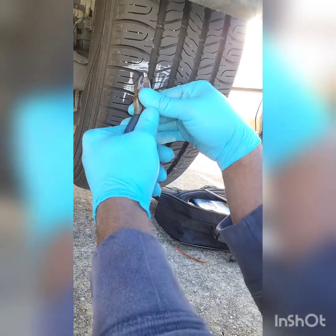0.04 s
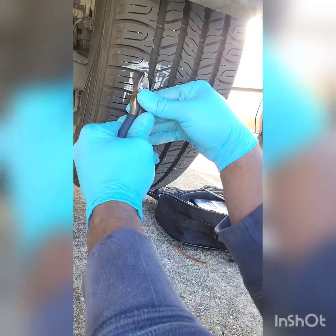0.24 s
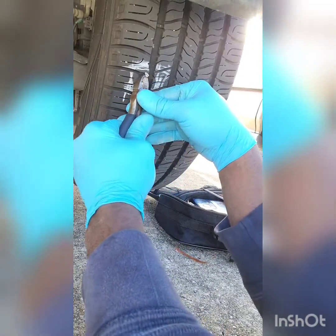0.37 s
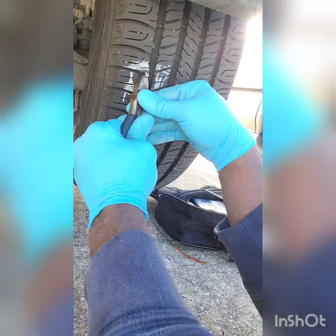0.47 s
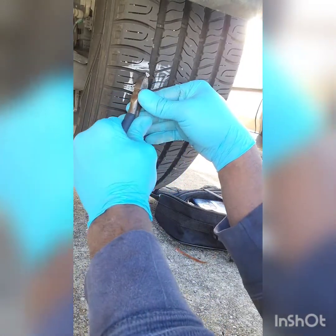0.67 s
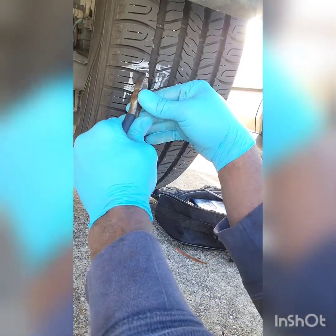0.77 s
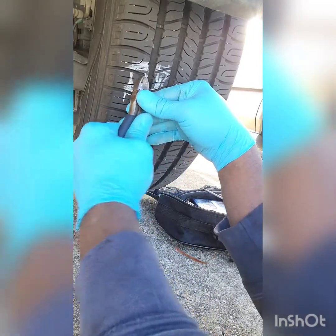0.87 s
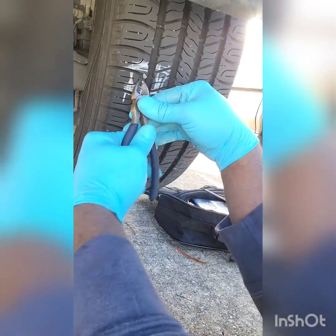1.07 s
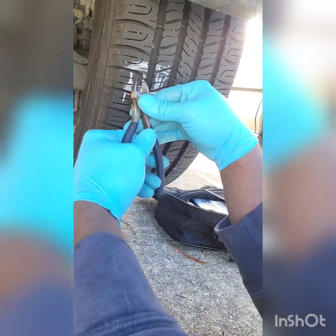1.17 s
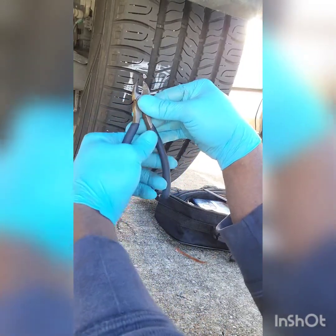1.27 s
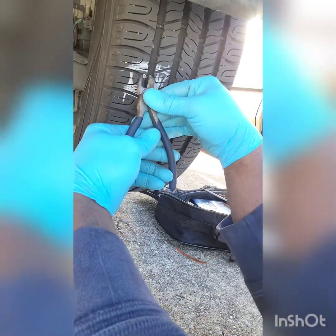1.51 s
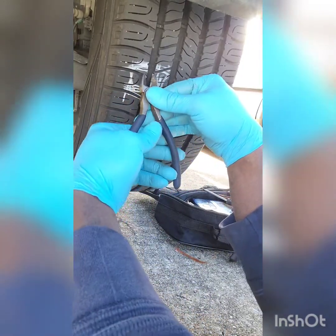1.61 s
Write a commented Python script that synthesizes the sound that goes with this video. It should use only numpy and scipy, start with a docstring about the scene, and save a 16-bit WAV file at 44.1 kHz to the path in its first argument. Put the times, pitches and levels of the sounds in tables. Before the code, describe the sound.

Tire leak hiss builds to a harsh rush, pliers clack midway, then it fades to faint seeping

```python
"""Air seeps from a punctured tire while pliers work a nail loose; turbulence makes a hiss, shaped noise.
The leak opens wide over half a second, with light ticks (noise snaps) and a faint knock on the way.
Near 0.56 s the pliers slip with a clack, decaying modes and a rattle; the loudest hiss overloads the left port.
By 1 s the leak is nearly shut; a faint breathy whistle near 3.3 kHz, narrow-band noise, is heard.
Street rumble, wind noise and low gust thumps at two microphone ports lie underneath."""
import sys
import numpy as np
from scipy import signal
from scipy.io import wavfile
from scipy.ndimage import uniform_filter1d

SR = 44100
rng = np.random.default_rng(int(sys.argv[2]) if len(sys.argv) > 2 else 0)


def volts(x):
    """Linear amplitude factor 10**(x/20) for a level x in dB, scalar or array-like."""
    e = np.asarray(x, float) / 20
    return 10 ** e


def digitize_waveform(pressure):
    """Quantize a signal to 16-bit integers and store it at the path in sys.argv[1].

    Rows of a 2-D input are taken as channels; values are limited to [-1, 1].
    """
    field = np.atleast_2d(pressure).T
    bounded = np.clip(field, -1, 1)
    quanta = np.round(bounded * 32767).astype(np.int16)
    wavfile.write(sys.argv[1], SR, quanta)


N = 72765  # samples, 1.65 s
RIGHT_LATE_S = 0.0002573  # arrival lag of hiss and ticks at the right port
HALVES = np.array([[.5], [-.5]])  # shares a left-minus-right level between the ports


def evened(x):
    """Normalization: scales to unit rms."""
    return x / np.sqrt(np.mean(x ** 2) + 1e-20)


def on_hz(table, hz, axis=1):
    """Spectral interpolation: reads a column on a log-frequency axis."""
    table = np.array(table)
    return np.interp(np.log(hz + 1), np.log(table[:, 0] + 1), table[:, axis])[:, None]


def on_s(table, t, axis=1):
    """Envelope interpolation: reads a column along time."""
    table = np.array(table)
    return np.interp(t, table[:, 0], table[:, axis])


def drift(shape, sizes):
    """Low-passed randomness: noise averaged twice along each axis, at unit rms."""
    z = rng.standard_normal(shape)
    for axis, size in enumerate(sizes):
        z = uniform_filter1d(uniform_filter1d(z, size, axis), size, axis)
    return evened(z)


def stft_grid(size):
    """Short-time spectrum: bin frequencies [Hz] and frame times [s]."""
    return np.fft.rfftfreq(size, 1 / SR), np.arange(4 * N // size + 5) * size / 4 / SR


def pair(field_db, same, late_s=0, ripple=1):
    """Partial coherence: two noises from a dB field (ports, bins, frames), the right one late."""
    bins, frames = field_db.shape[1:]
    a, b, c, d = rng.standard_normal((frames, bins, 4)).T
    same = np.clip(same, -1, 1)
    left = a + 1j * b
    # a delay is a phase turn proportional to frequency
    turn = np.exp(-2j * np.pi * late_s * np.linspace(0, SR / 2, bins))[:, None]
    right = same * turn * left + np.sqrt(1 - same ** 2) * (c + 1j * d)
    spectrum = np.array([left, right]) * volts(field_db) * ripple
    size = 2 * bins - 2
    noise = signal.istft(spectrum, nperseg=size, noverlap=size - size // 4)[1]
    return evened(noise[:, :N])


def place(out, sound, s, pan_db, late_s):
    """Stereo cues: lays a short sound on both ports with a level and time difference."""
    laid = np.zeros_like(out)
    for port, at_s, db in zip(laid, (s, s + late_s), (pan_db / 2, -pan_db / 2)):
        port[round(at_s * SR):][:len(sound)] = sound * volts(db)
    return out + laid


# spectrum of the street: (frequency [Hz], relative density [dB per Hz])
STREET_SPECTRUM = [(12, -37), (20, -12), (64, -1.5), (167, -16), (342, -25.5), (552, -26), (933, -35.5),
                   (1500, -33.5), (3000, -52.5), (6000, -79), (13200, -120)]
# coherence of the street between the ports: (frequency [Hz], left-right likeness [-1 to 1])
STREET_LIKENESS = [(60, 0.85), (130, 1), (290, 0.91), (640, 0.27), (1410, 0.17), (3100, -0.37)]
# swell of the bass, used about its mean: (time [s], relative level [dB])
BASS_SWELL = [(0.0, -45), (0.196, -30.5), (0.83, -30), (0.854, -29), (1.014, -34.5), (1.13, -27.5),
              (1.162, -39), (1.282, -32), (1.622, -27), (1.65, -29)]
# level difference of the street: (frequency [Hz], left minus right [dB])
STREET_TILT = [(60, 0.5), (240, 1), (950, 0), (3770, 0), (15000, 10.0)]
STREET_DB, STREET_PATCH_DB = -29, 2.5


def street():
    """Distant traffic as partly coherent noise: a swelling bass over a dull, patchy wash."""
    hz, frames = stft_grid(size=2048)
    swell_db = on_s(BASS_SWELL, frames)
    bass = 1 / (1 + (hz[:, None] / 150) ** 4)
    field_db = on_hz(STREET_SPECTRUM, hz) + (swell_db - swell_db.mean()) * bass
    field_db = field_db + STREET_PATCH_DB * drift(field_db.shape, (3, 8))
    half_db = on_hz(STREET_TILT, hz) / 2
    both_db = np.array([field_db + half_db, field_db - half_db])
    return volts(STREET_DB) * pair(both_db, on_hz(STREET_LIKENESS, hz))


# strength of the wind: (time [s], relative level [dB], left minus right [dB])
WIND_LEVEL = [(0, -35, -12), (.15, -30.5, -2.5), (.5, -27, 1), (.85, -35.5, -8), (1, -32.5, 3.5),
              (1.65, -40, -9)]
# spectrum of the wind: (frequency [Hz], relative density [dB per Hz])
WIND_SPECTRUM = [(12, -32), (20, -18.5), (43, -2.5), (80, -7.5), (201, -16), (320, -19), (900, -29.5),
                 (1170, -121)]
WIND_DB, WIND_LUMPS_DB = -2, 3


def wind():
    """Incoherent flow noise: lumpy low noise, unrelated at the two ports."""
    hz, frames = stft_grid(size=2048)
    lumps_db = WIND_LUMPS_DB * drift((2, len(hz), len(frames)), (1, 4, 2))
    noise = pair(on_hz(WIND_SPECTRUM, hz) + lumps_db, 0)
    t = np.arange(N) / SR
    return noise * volts(WIND_DB + on_s(WIND_LEVEL, t) + on_s(WIND_LEVEL, t, axis=2) * HALVES)


# single gusts: (time of centre [s], peak of the envelope before panning [dB], frequency [Hz],
# half-length to 1/e [s], left minus right [dB])
GUSTS = [(0.221, -23, 88, 0.0057, 22), (0.421, -30, 47.2, 0.021, 0), (0.628, -22, 46.6, 0.013, -12),
         (0.866, -22.5, 56, 0.011, -10)]


def thumps():
    """Gaussian wave packets: each gust is a low cosine under a bell-shaped envelope."""
    t = np.arange(N) / SR
    out = np.zeros((2, N))
    for s, db, hz, length_s, pan_db in GUSTS:
        wave = np.cos(2 * np.pi * (hz * (t - s) + rng.random()))
        bell = np.exp(-((t - s) / length_s) ** 2)
        out = out + wave * bell * volts(db + pan_db * HALVES)
    return out


# steel on steel: (time [s], starting level before filter and pan [dB], high-pass corner [Hz],
# left minus right [dB])
STEEL_TICKS = [(0.038, -32.5, 1800, -13), (0.2364, -36, 2500, 6), (0.742, -27, 500, 8)]
TICK_T60_S = 0.0078


def ticks():
    """Exponential decay: light contacts of steel are thin snaps of high-passed noise."""
    out = np.zeros((2, N))
    t = np.arange(SR // 50) / SR
    for s, level_db, hz, pan_db in STEEL_TICKS:
        highpass = signal.butter(2, hz, "highpass", fs=SR)
        snap = signal.lfilter(*highpass, rng.standard_normal(len(t)))
        out = place(out, snap * volts(level_db - 60 * t / TICK_T60_S), s, pan_db, RIGHT_LATE_S)
    return out


# the pliers slip and knock the tread: (time [s], level of the knock [dB],
# brightness of the ring about 2000 Hz [dB per octave])
KNOCKS = [(.5567, -9.5, 1.5), (.559, -17, -2.5), (.5628, -15, -1), (.2905, -33, 3.5)]
# modes of pliers and tire: (frequency [Hz], relative level [dB], time to decay 60 dB [s])
MODES = [(321, -11, 0.079), (561, -13.5, 0.1), (913, -11.5, 0.099), (1250, -2.5, 0.03), (1940, -8, 0.055),
         (1800, -9, .06), (660, -13, .04), (2760, 2, .012), (3050, -13.5, 0.037), (4036, -2.5, 0.048),
         (4700, -6, 0.013), (7600, -1.5, 0.01)]
RATTLE_DB, RATTLE_T60_S, RATTLE_HZ = -8, 0.052, (500, 6800)
CLACK_PAN_DB, CLACK_RIGHT_LATE_S, CLACK_RISE_S = -3.5, .00036, .0006


def clacks():
    """Modal excitation: each knock rings damped modes of steel and rubber, with a noisy rattle."""
    out = np.zeros((2, N))
    t = np.arange(SR // 5) / SR
    band = signal.butter(2, RATTLE_HZ, "bandpass", fs=SR)
    rise = np.minimum(t / CLACK_RISE_S, 1)
    for s, level_db, tilt_db in KNOCKS:
        rattle = evened(signal.lfilter(*band, rng.standard_normal(len(t))))
        rattle = rattle * volts(RATTLE_DB - 60 * t / RATTLE_T60_S)
        ring = np.zeros(len(t))
        for hz, db, t60_s in MODES:
            decay_db = db + tilt_db * np.log2(hz / 2000) - 60 * t / t60_s
            ring = ring + volts(decay_db) * np.sin(2 * np.pi * hz * t)
        knock = (rattle + ring) * rise * volts(level_db)
        out = place(out, knock, s, CLACK_PAN_DB, CLACK_RIGHT_LATE_S)
    return out


# faint breathy whistle: (time [s], pitch [Hz], level before panning [dB])
WHISTLE_PATH = [(1.04, 3050, -94), (1.07, 3050, -59), (1.1, 3184, -79), (1.135, 3370, -56),
                (1.2, 3380, -64), (1.285, 3420, -59), (1.315, 3440, -78), (1.35, 3340, -66),
                (1.43, 3250, -91)]
WHISTLE_WIDTH_HZ, WHISTLE_PAN_DB = 120, 11.5  # pan is left minus right


def whistle():
    """Narrow-band modulation: slow complex noise rides on a carrier of sliding pitch."""
    t = np.arange(N) / SR
    window = max(int(SR / WHISTLE_WIDTH_HZ / 2), 1)
    real, imaginary = drift((N, 2), (window, 1)).T
    carrier = np.exp(2j * np.pi * np.cumsum(on_s(WHISTLE_PATH, t)) / SR)
    tone = ((real + 1j * imaginary) * carrier).real
    return tone * volts(on_s(WHISTLE_PATH, t, axis=2) + WHISTLE_PAN_DB * HALVES)


# opening of the leak: (time [s], relative level [dB], extra level of the hiss under TILT_HZ [dB])
LEAK_OPENING = [(0, -44.5, -0.5), (.065, -41.5, 2), (.105, -31.5, -14), (.16, -32, -5), (.21, -24, -8),
                (.285, -20, -6), (.345, -16.5, -9), (.44, -15.5, 0), (.49, -15, -2.5), (.55, -10.5, -6.5),
                (.59, -13, -0.5), (.69, -10.5, -2.5), (.735, -14.5, 2.5), (.815, -15.5, -3.5),
                (.858, -24, 3.5), (.935, -26, -0.5), (.975, -44.5, 10), (1.02, -44, -1), (1.15, -44, 8.5),
                (1.3, -46.5, 7), (1.5, -46.5, 9), (1.65, -41.5, 1)]
# colour of the jet, shaped by tread and wheel arch: (frequency [Hz], relative left level [dB],
# relative right level [dB], relative left-right likeness [0 to 1])
JET_COLOUR = [(1260, -29, -35, 0.5), (1990, -72, -39, 0.4), (2684, -17.5, -18, 0.04),
              (3590, -16, -45, 0.45), (4010, -32, -15.5, 0.33), (4500, -16.5, -26.5, 0.3),
              (5530, -11.5, -18, 0.7), (6530, -20, -39, 0), (6640, -19, -9, 0), (7550, -7.5, -39.5, 1),
              (9230, -19, -12.5, 0), (9910, -13, -28, 0.3), (9900, -7, -10.5, 1), (12100, -7.5, -18, 0.15),
              (11780, -9, -8, 1), (13750, 1, -10, 1), (14220, -4.5, -7, 0.2), (15360, 7, -25, 0.9),
              (15770, -2, -3.5, 1)]
# colour the hiss takes on once the opening falls under FAINT_DB: (frequency [Hz], gain [dB])
FAINT_COLOUR = [(2600, 4), (3900, -6.5), (7500, 0.5), (8700, -3), (12000, -0.5), (15000, 4)]
# a sliding dip or lift in the hiss near 4 to 5 kHz: (time [s], centre [Hz], gain [dB])
SLIDING_BAND = [(0, 4700, -4), (.08, 4700, -14), (.2, 4350, -17), (.42, 5050, -37), (.5, 4370, 4.5),
                (.7, 4350, -2), (1.1, 4230, 0.5), (1.65, 4130, 4)]
JET_DB, FAINT_DB = 7, -39
TILT_HZ, JET_LOW_HZ, SLIDING_WIDTH_HZ = 6030, 1520, 260
PATCH_DB, FLUTTER_DB, SPUTTER_DB = 1.5, 0.55, 0.5
RIPPLE, LIKENESS_GAIN = 0.49, 1.14


def jet():
    """Turbulent jet noise: patchy, fluttering hiss whose strength follows the opening of the leak."""
    hz, frames = stft_grid(size=1024)
    shape = len(hz), len(frames)
    column = hz[:, None]
    lower = 1 / (1 + (column / TILT_HZ) ** 4)
    cut_db = -10 * np.log10(1 + (JET_LOW_HZ / (column + 1)) ** 4)
    tilt_db = lower * on_s(LEAK_OPENING, frames, axis=2)
    patch_db = PATCH_DB * drift(shape, (12, 5))
    faint = 1 / (1 + volts(on_s(LEAK_OPENING, frames) - FAINT_DB) ** 2)
    faint_db = faint * on_hz(FAINT_COLOUR, hz)
    away = (column - on_s(SLIDING_BAND, frames)) / SLIDING_WIDTH_HZ
    sliding_db = on_s(SLIDING_BAND, frames, axis=2) * np.exp(-away ** 2)
    ports_db = np.array([on_hz(JET_COLOUR, hz, axis=1), on_hz(JET_COLOUR, hz, axis=2)])
    field_db = ports_db + cut_db + tilt_db + patch_db + faint_db + sliding_db
    # small reflections off nearby surfaces ripple the colour at each port and drift slowly
    real, imaginary = drift((2, 2) + shape, (1, 1, 2, 60))
    ripple = 1 + RIPPLE * (real + 1j * imaginary)
    likeness = LIKENESS_GAIN * on_hz(JET_COLOUR, hz, axis=3)
    air = pair(field_db, likeness, RIGHT_LATE_S, ripple)
    waver_db = FLUTTER_DB * drift((N,), (900,)) + SPUTTER_DB * drift((N,), (60,))
    return air * volts(JET_DB + on_s(LEAK_OPENING, np.arange(N) / SR) + waver_db)


def scene():
    """Superposition: the pressures of all sources add at the two ports."""
    return street() + wind() + thumps() + ticks() + clacks() + whistle() + jet()


def low_pass(x):
    """Removes everything above the highest recorded frequency."""
    return signal.sosfilt(signal.butter(12, 15840, fs=SR, output="sos"), x)


def record(dry):
    """Overload: the converter clips whatever exceeds full scale."""
    clipped = np.clip(dry, -1, 1)
    return low_pass(clipped)


dry = scene()
out = record(dry)
digitize_waveform(out)
```